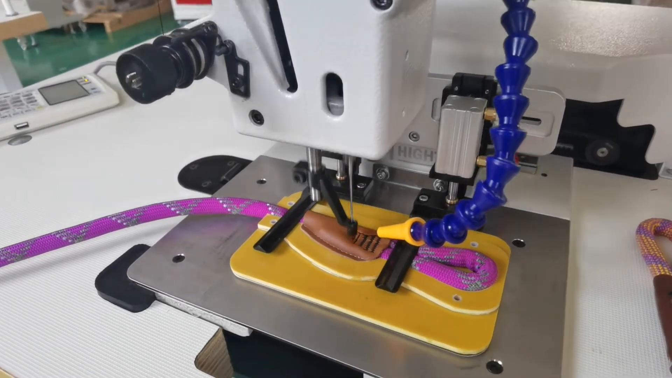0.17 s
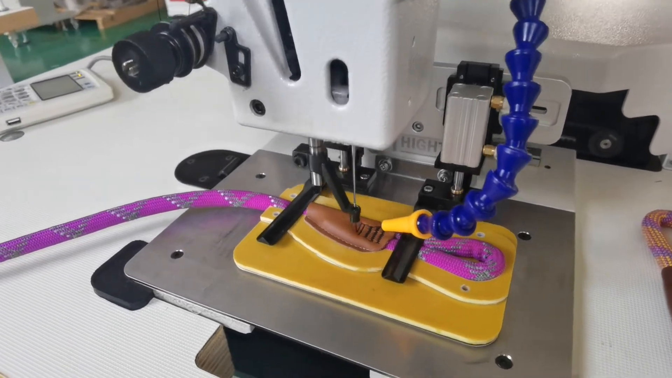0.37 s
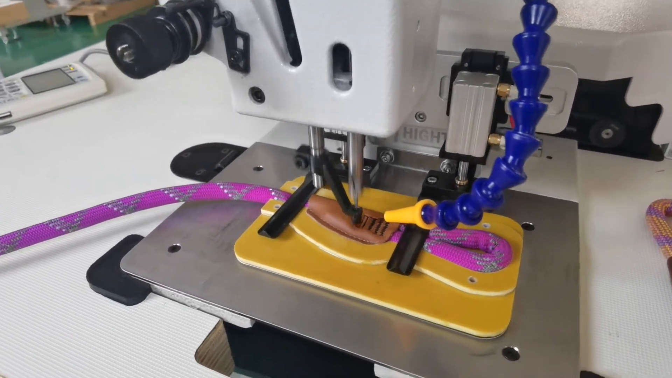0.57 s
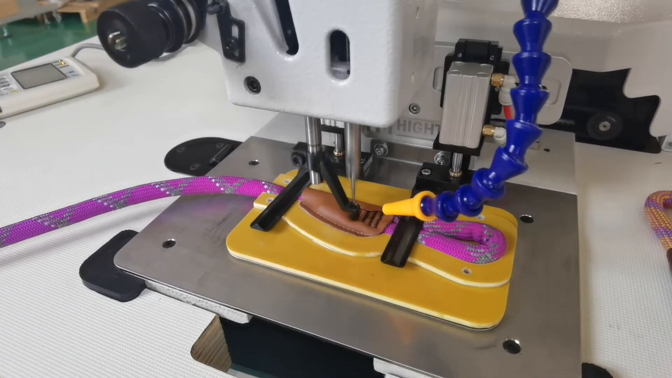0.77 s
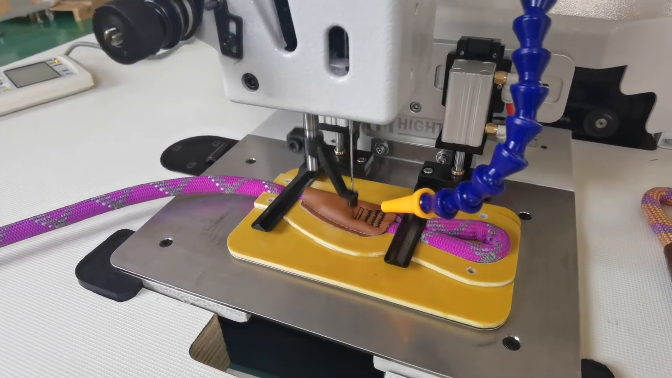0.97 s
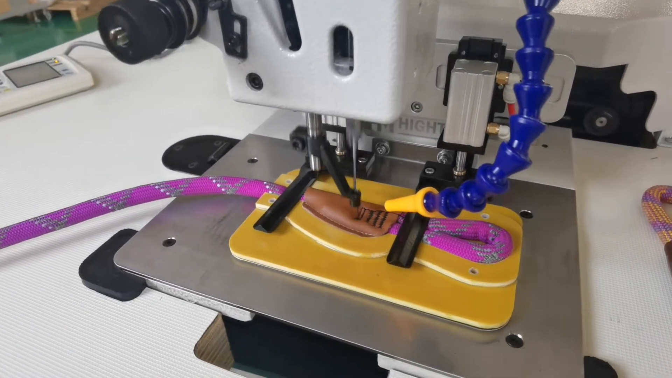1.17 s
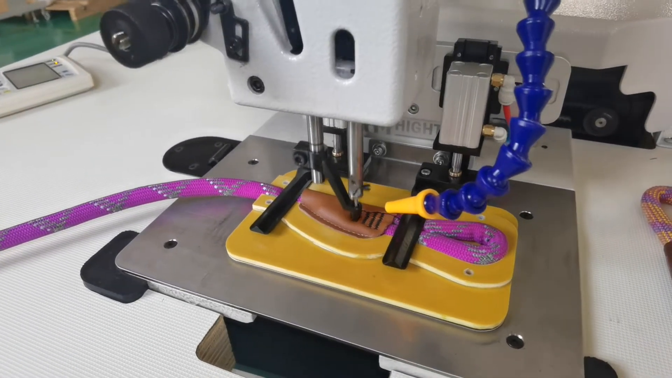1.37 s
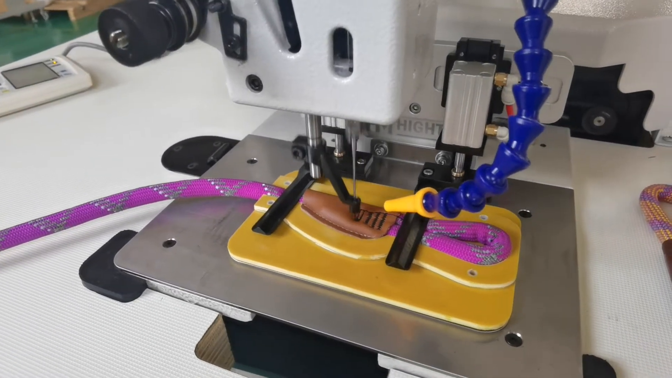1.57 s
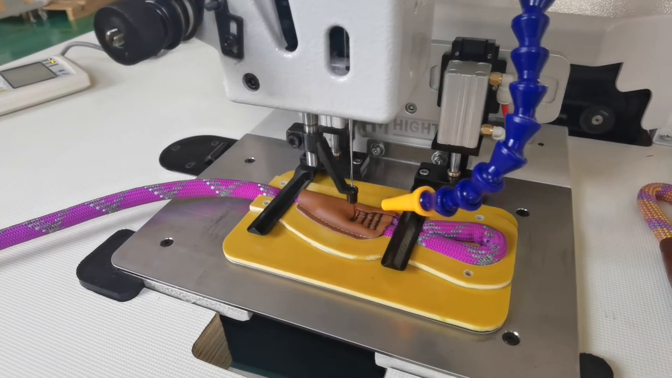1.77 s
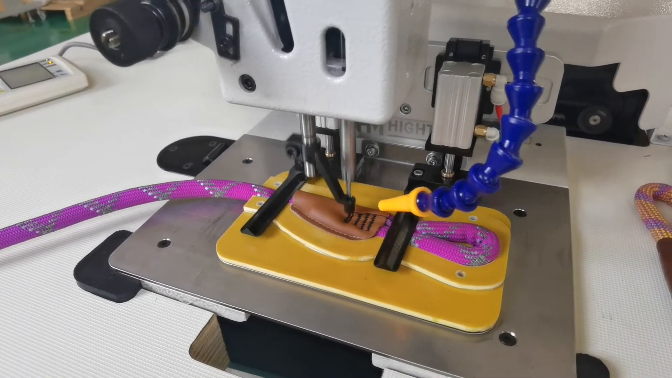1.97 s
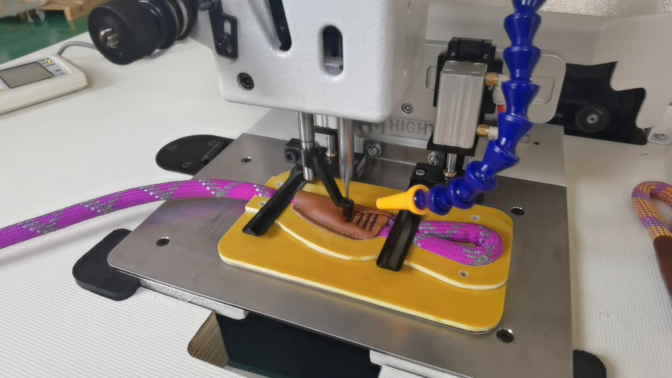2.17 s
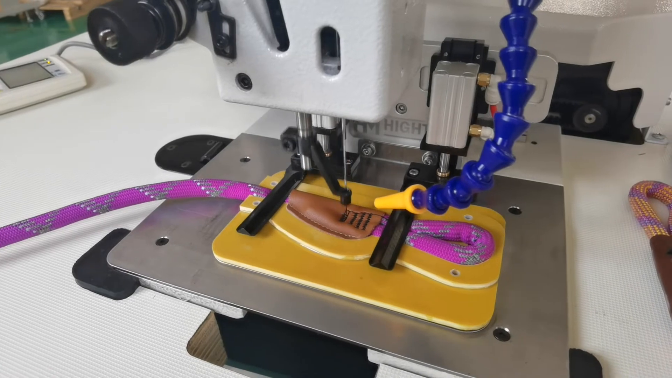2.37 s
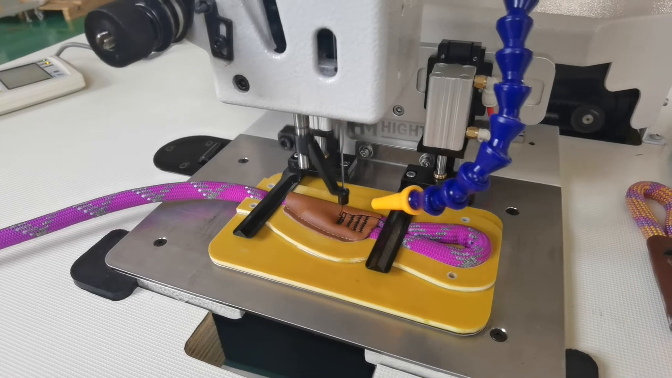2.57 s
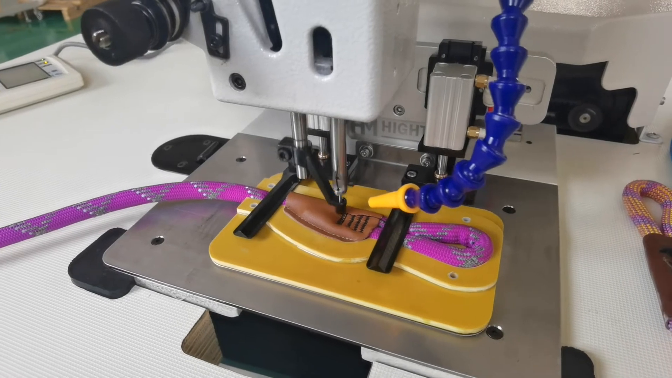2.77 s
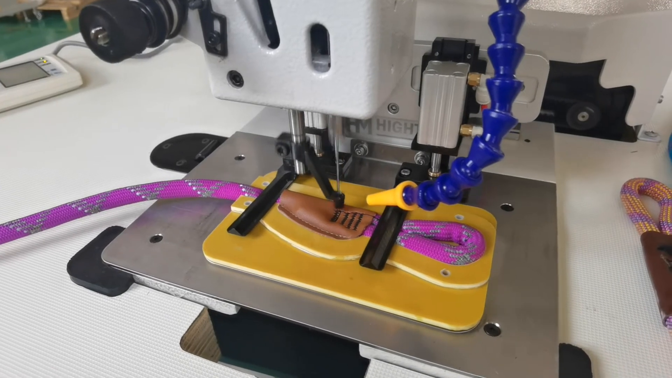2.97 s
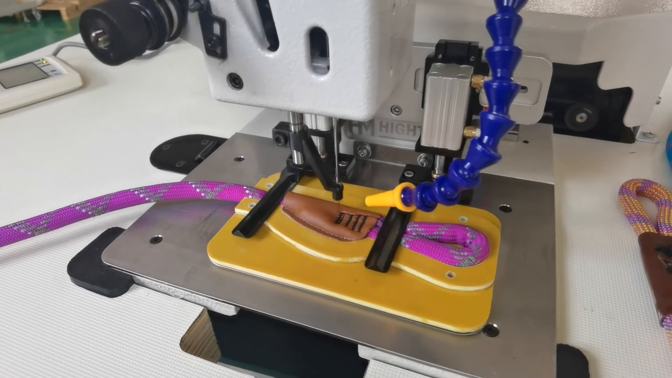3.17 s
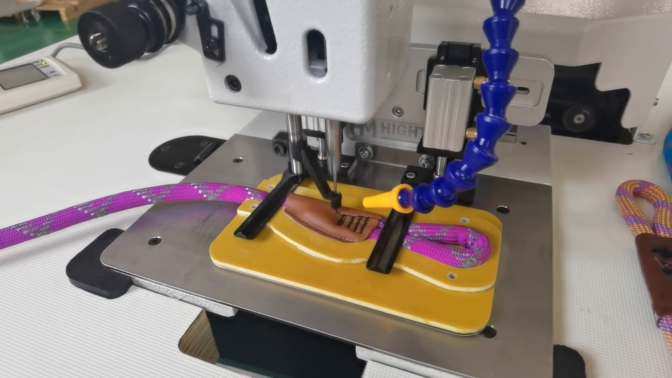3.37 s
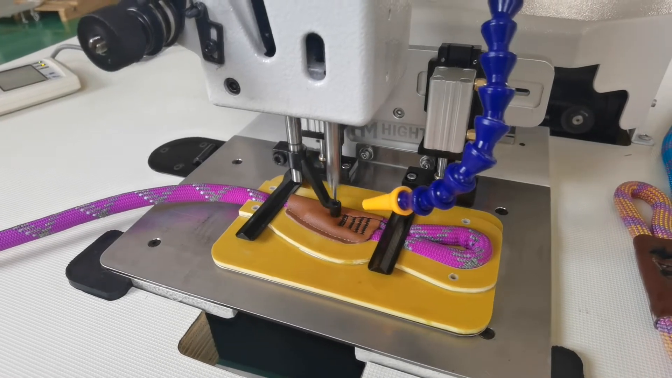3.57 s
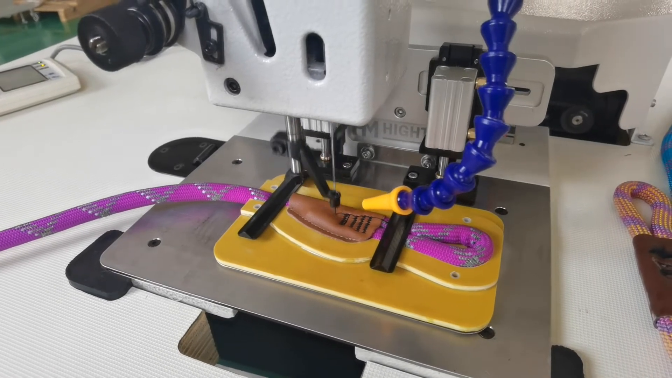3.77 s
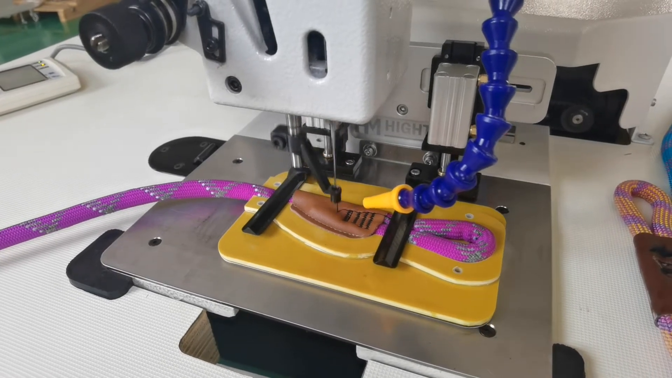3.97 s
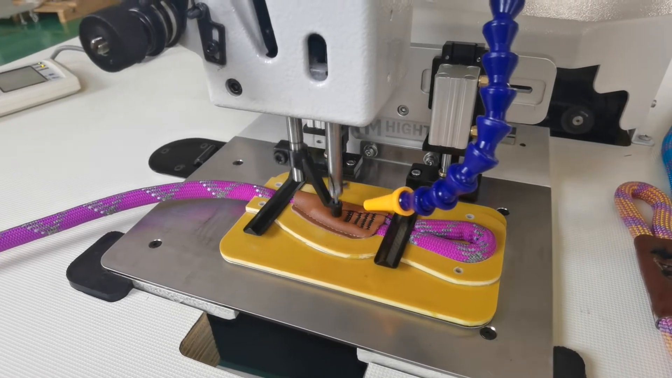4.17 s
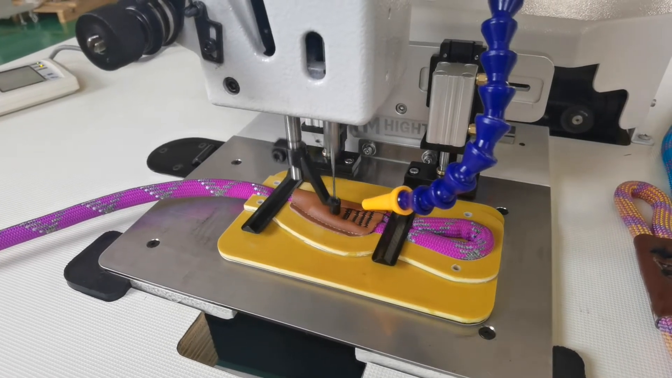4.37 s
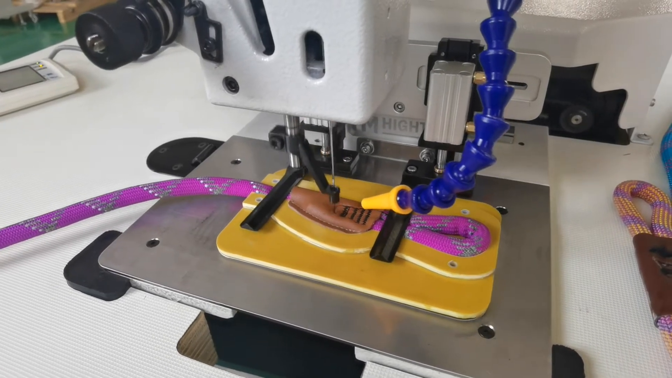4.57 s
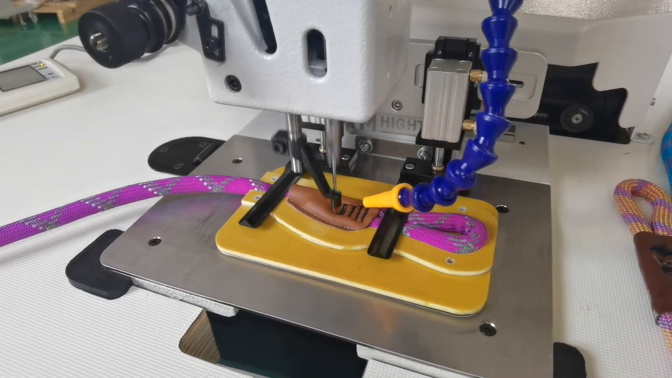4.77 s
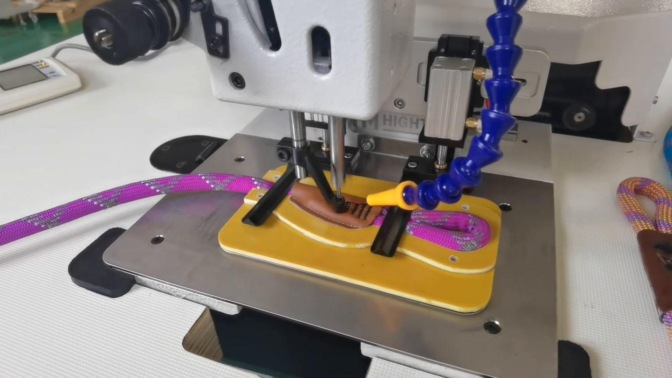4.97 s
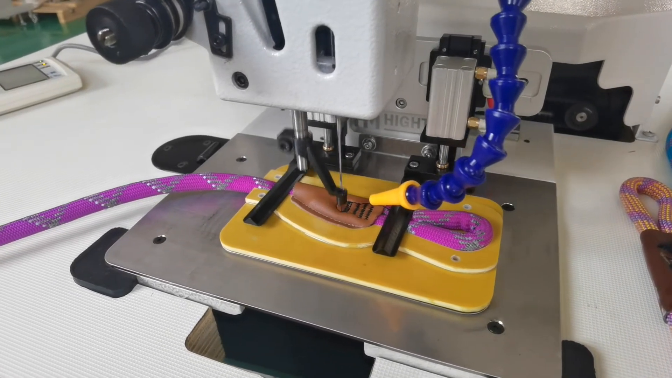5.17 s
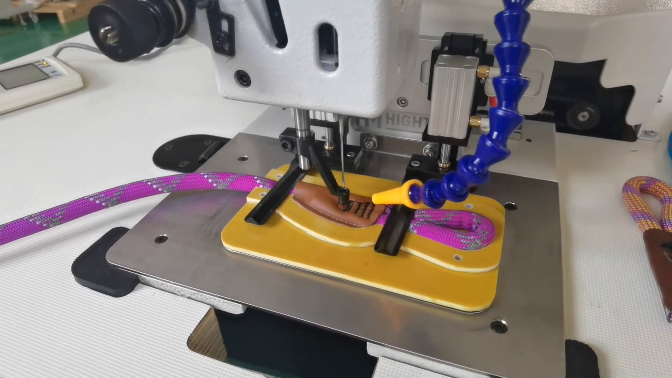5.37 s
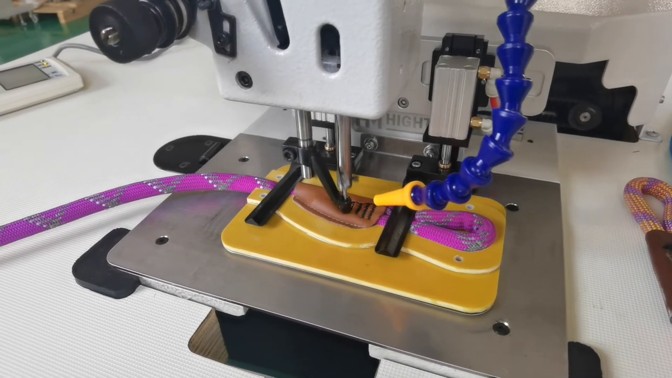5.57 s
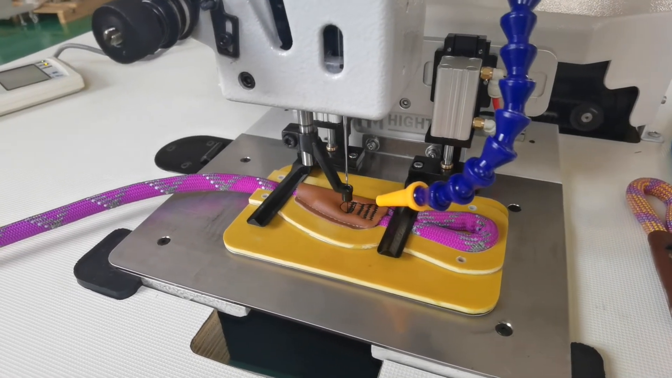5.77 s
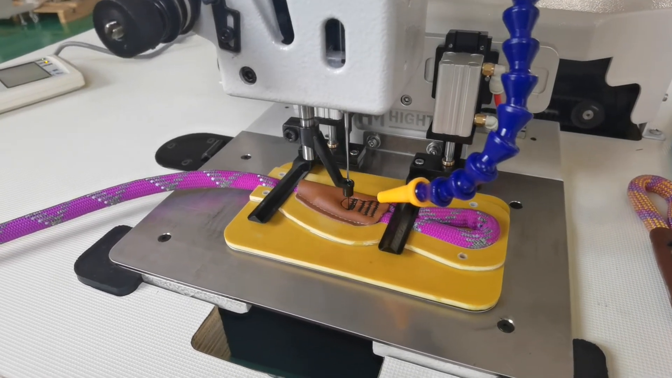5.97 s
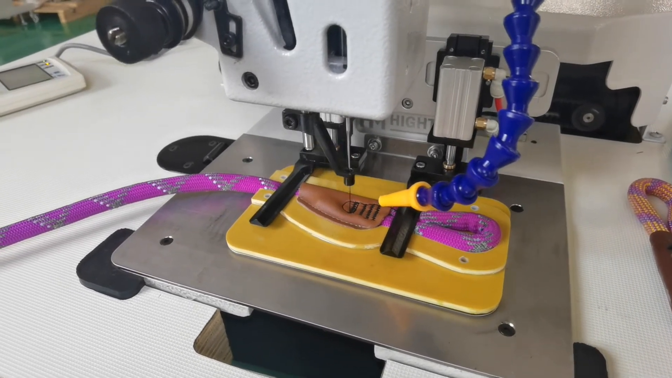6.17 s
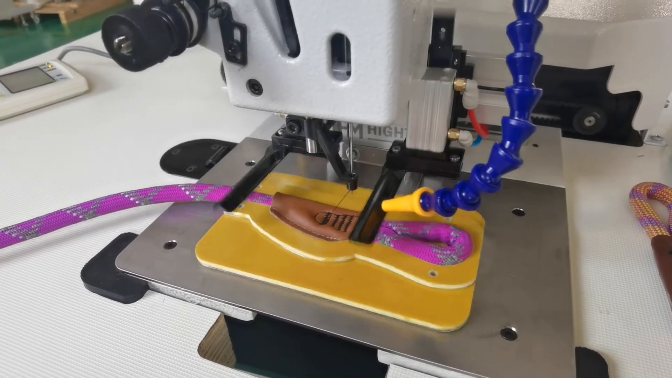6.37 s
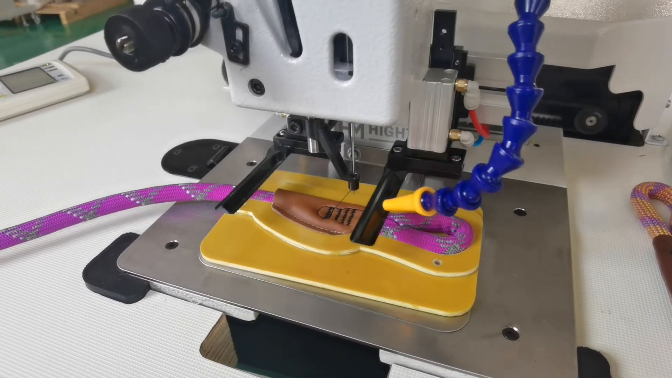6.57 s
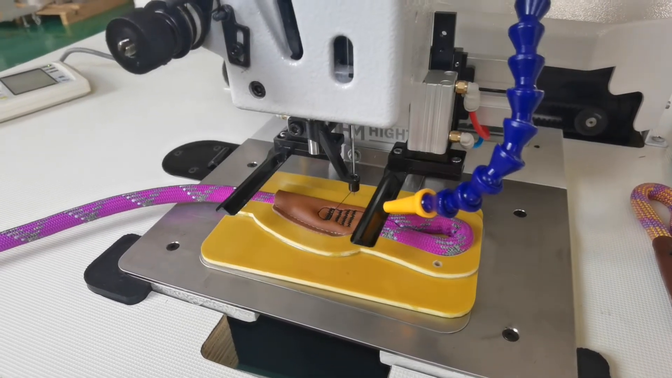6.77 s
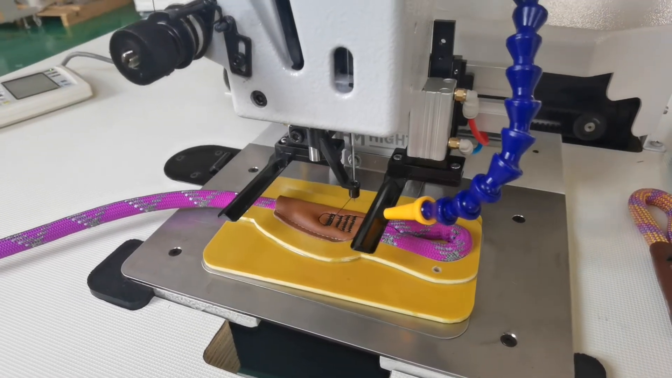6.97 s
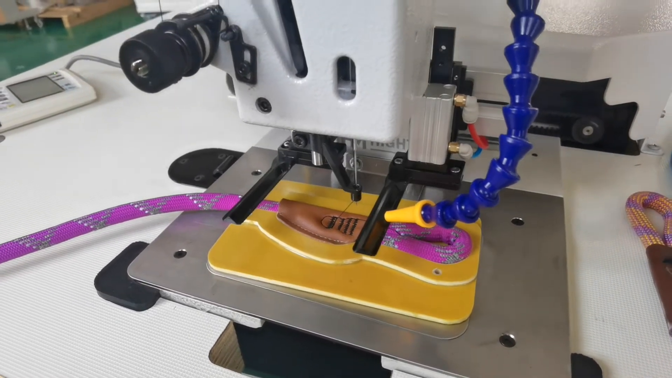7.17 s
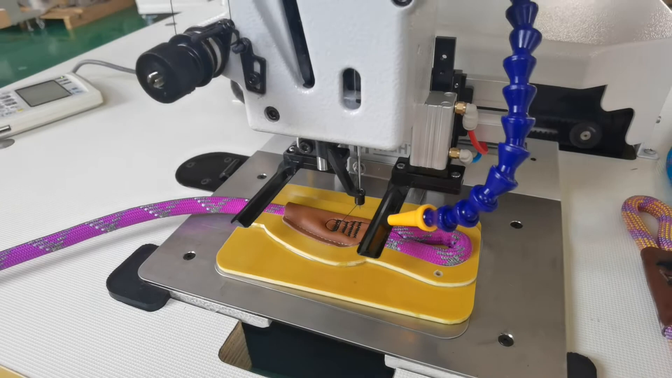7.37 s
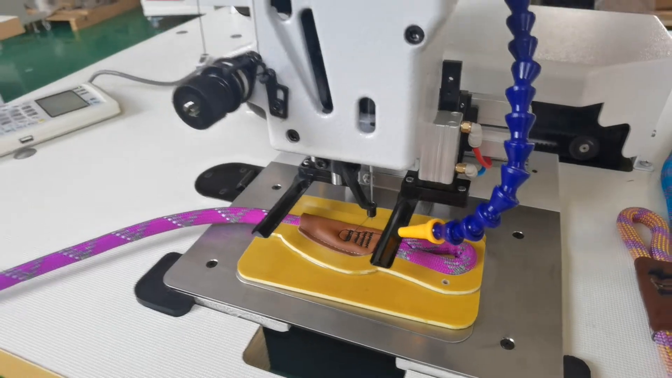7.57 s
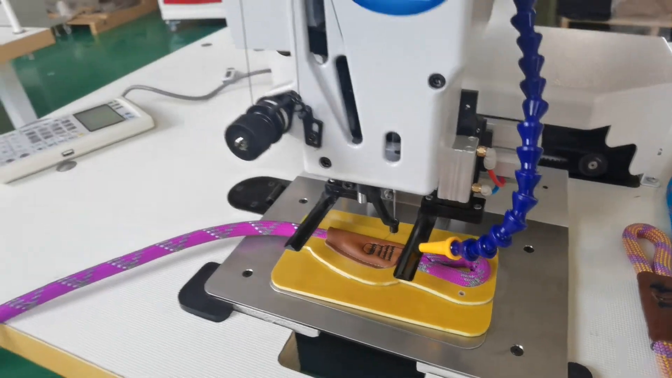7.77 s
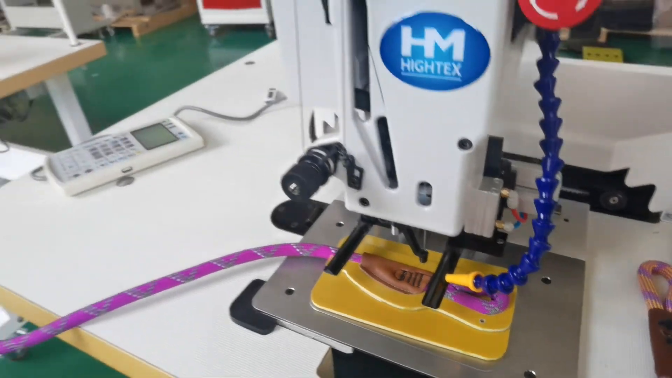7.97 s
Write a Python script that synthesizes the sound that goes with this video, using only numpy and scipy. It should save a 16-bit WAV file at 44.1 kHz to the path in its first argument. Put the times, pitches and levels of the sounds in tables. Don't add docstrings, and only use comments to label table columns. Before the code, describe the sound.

A sewing machine rattles at a fast steady metallic pace, slows through two last strokes, then air puffs and sharp trimmer and clamp clicks end it.

```python
import sys
import numpy as np
from scipy import signal
from scipy.fft import rfft, irfft
from scipy.io import wavfile
from scipy.ndimage import uniform_filter1d

SR = 44100
rng = np.random.default_rng(int(sys.argv[2]) if len(sys.argv) > 2 else 0)


def boost_factor(decibels):
    exponent = np.asarray(decibels, float) / 20
    return 10 ** exponent


def log_audio(samples):
    frames = np.atleast_2d(samples).T
    limited = np.clip(frames, -1, 1)
    pcm = np.round(limited * 32767).astype(np.int16)
    wavfile.write(sys.argv[1], SR, pcm)


N = 353662
T = np.arange(N) / SR
HZ = np.fft.rfftfreq(4096, 1 / SR)
TURN_S, TURNS, STOP_S = .15524, 34, 5.2
TOPS = np.arange(TURNS) * TURN_S
RELEASE_S = 6.25


# (time [s], peak level [dB], ring frequency [Hz], hush before it [dB])
RESTARTS = [(.0174, -11, 6410, -2.5), (0.1765, -5.5, 6400, -2), (0.3504, -6, 6400, -6),
            (.4823, -4, 5720, -6), (0.642, -2.5, 6420, -10), (.7941, -5, 6400, -5),
            (0.9505, -12, 6070, -9.5), (1.103, -5, 5750, -2.5), (1.269, -11, 5940, -8.5),
            (1.4177, -7, 6540, -11.5), (1.5703, -7, 6390, -2), (1.727, -1.5, 6300, -6),
            (1.88, -4.5, 6500, -4.5), (2.036, -6, 6400, -5), (2.1926, -2, 6420, -1),
            (2.348, -5, 6100, -5.5), (2.659, -6, 6340, -9.5), (2.8135, -7, 6400, -9),
            (3.297, -8, 6330, -3.5), (3.4583, -4.5, 6000, -9), (3.587, 2, 6300, -5),
            (3.739, -2, 8000, -12.5), (3.897, -2, 5750, -5.5), (4.053, -3, 6400, -6.5),
            (4.3637, -21, 5940, -4), (4.5132, -1.5, 6400, -8), (4.69, -24, 6400, -6.5),
            (4.99, -16, 6400, -7), (5.1459, -4, 8200, -1.5)]


def drive_train():
    lull_db = np.full(TURNS, -5.5)
    restart = np.full(TURNS, .018)
    s, hush_db = np.transpose(RESTARTS)[[0, 3]]
    stroke = (s // TURN_S).astype(int)
    lull_db[stroke] = hush_db
    restart[stroke] = np.clip(s % TURN_S, .012, .021)

    which = np.minimum(T // TURN_S, TURNS - 1).astype(int)
    angle, near_db, slow_db = T % TURN_S, nearness(), slowing()
    turning = T < STOP_S
    fall = np.interp(angle, [.002, .007], [0, 1])
    jump_back = np.clip((restart[which] - angle) / 0.00075, 0, 1)
    lull = fall * jump_back * (lull_db[which] + 0.5)

    pace_db = np.where(turning, -26 + near_db + lull, slow_db)
    rattle_db = pace_db + turning * (2.64 + shaft_load(angle))
    steady_whirr_db = -36.5 + 1.32 * near_db + whirr_load() + 0.22 * lull
    slow_whirr_db = uniform_filter1d(slow_db, size=1500) - 14.5
    whirr_db = np.where(turning, steady_whirr_db, slow_whirr_db)

    rattle = steel_head(boost_factor(rattle_db) * patchy(grit(0.34, grain=60), patchy_db=4))
    whirr = gear_case(boost_factor(whirr_db) * patchy(grit(0.47, grain=150), patchy_db=4.5))
    return rattle + whirr + cooling_nozzle(boost_factor(pace_db - 14.0) * grit(.8, grain=40))


# (frequency [Hz], level [dB])
RATTLE = [(2060, -14.5), (3500, -16.5), (3920, -18), (5030, -7.5), (5430, -8), (6240, -0.5), (7370, -4),
          (8310, -0.5), (9140, -9.5), (9870, -9.5), (11700, -23.5), (15200, -36), (16000, -30.5)]
# (frequency [Hz], width [Hz], level [dB])
HEAD = [(3920, 250, -9), (4670, 17, 8), (5750, 470, 3), (6400, 42, 9), (7230, 210, 4.5), (7870, 100, 3),
        (8350, 420, 2), (9900, 400, 2)]


def steel_head(x):
    return colour(x, RATTLE, HEAD)


# (frequency [Hz], level [dB])
WHIRR = [(530, -26), (900, -8.5), (1050, -5.5), (1390, -5), (2010, 1), (2520, -4.5), (3440, 1.5), (3910, 5),
         (4500, -2.5), (5850, -55), (9900, -120)]
# (frequency [Hz], width [Hz], level [dB])
GEARS = [(2016, 220, 5), (2190, 180, 0), (2660, 460, 6.5), (3520, 190, 3), (3860, 320, -9)]


def gear_case(x):
    return colour(x, WHIRR, GEARS)


# (frequency [Hz], level [dB])
NOZZLE = [(7000, -35), (10500, 4.5), (13000, -2.5), (15800, -5.5)]


def cooling_nozzle(x):
    return colour(x, NOZZLE)


# (time after top [s], level [dB])
TURN = [(0, 4), (.005, -1), (.018, 3), (.045, 1.5), (.062, 0.5), (.082, -3.5), (.102, -1), (.114, 2),
        (.135, 0.5), (.15, 4), (.156, 3.5)]


def shaft_load(angle):
    return curve(TURN, 1, angle)


def whirr_load():
    angle = T % TURN_S
    pierce_s, pierce_width_s, pierce_db = 0.071, 0.02, 3.5
    return 0.18 * shaft_load(angle) + pierce_db * np.exp(-((angle - pierce_s) / pierce_width_s) ** 2)


# (start [s], length [s], level at start [dB], level at end [dB])
LAST_STROKES = [
    (5.203, 0.11, -24.5, -21),
    (5.359, 0.241, -21, -24.5),
]


def slowing():
    coast_db, sag_db, stop_db_s = -34.5, -3, 1191
    parts = [held(STOP_S, LAST_STROKES[-1][0] - STOP_S, coast_db, stop_db_s, stop_db_s)]
    for s, length, first_db, last_db in LAST_STROKES:
        u = np.clip((T - s) / length, 0, 1)
        shape_db = first_db + (last_db - first_db) * u + sag_db * np.sin(np.pi * u)
        parts.append(held(s, length, shape_db, stop_db_s, stop_db_s))
    return blend(parts)


# (time [s], nearness level [dB])
NEARNESS = [
    (0, 2),
    (.25, 4),
    (1, 3),
    (2.5, 0),
    (3.4, 0),
    (4.2, 0.35),
    (5.21, 0.65),
]


def nearness(t=T):
    return curve(NEARNESS, 1, t)


# (time [s], peak level [dB], ring frequency [Hz])
HOOK = [(0.1378, -10, 6300), (0.2929, -13, 6360), (0.4485, -12, 6280), (0.6015, -11, 6370),
        (0.7587, -9, 6530), (0.9141, -14.5, 6440), (1.0695, -14, 6900), (1.2227, -13, 5790),
        (1.3788, -10, 6400), (1.5368, -17, 7760), (1.6886, -21, 5670), (1.8446, -13, 6430),
        (1.9987, -16, 6440), (2.1551, -17, 7700), (2.3105, -12.5, 7860), (2.4652, -10, 6300),
        (2.6219, -13.5, 8040), (2.7764, -16.0, 6540), (2.9298, -18.5, 6380), (3.0859, -13, 6450),
        (3.2382, -16, 8040), (3.396, -10.5, 6500), (3.5518, -16, 6410), (3.7077, -17, 6420),
        (3.8611, -16, 8270), (4.0165, -12, 6500), (4.1725, -19, 6420), (4.3272, -12.5, 6430),
        (4.4822, -13, 6400), (4.6373, -16, 6380), (4.7926, -17.5, 6410), (4.9489, -13, 6430),
        (5.1076, -11, 8450)]
# (time [s], peak level [dB], ring frequency [Hz])
TAKE_UP = [(0.1487, -11, 7400), (0.3009, -17, 6380), (0.4577, -14.5, 6410), (0.615, -8, 6270),
           (0.7614, -14, 6420), (0.9256, -15.0, 6070), (1.0769, -14, 6430), (1.2358, -14.0, 5750),
           (1.3877, -13, 6450), (1.5439, -10, 6460), (1.6988, -11, 6460), (1.8552, -12.5, 6470),
           (2.0081, -15, 6530), (2.1659, -15, 8320), (2.3208, -16, 8340), (2.476, -22, 6170),
           (2.6327, -15, 6540), (2.7858, -14, 6450), (2.9421, -22, 7420), (3.0958, -18.0, 6450),
           (3.2536, -14.5, 6400), (3.4057, -15, 6410), (3.5622, -22, 6490), (3.7132, -22, 8360),
           (3.8728, -21, 8350), (4.0258, -14, 7790), (4.1837, -18, 8260), (4.3362, -20, 7720),
           (4.4909, -21, 7910), (4.648, -13, 6400), (4.8027, -15, 7730), (4.9625, -12, 6440),
           (5.1173, -16.5, 7350)]
# (time [s], peak level [dB], ring frequency [Hz])
STRAYS = [(0.5703, -15, 6400), (1.039, -11.5, 7800), (1.2595, -10, 6010), (1.8198, -9, 8400),
          (3.25, -4, 6500), (4.61, -13, 8600), (1.356, -12, 6300), (1.666, -13, 8700), (2.053, -8, 8200),
          (2.187, -7, 8350), (2.3667, -7, 6160), (2.5563, -10, 6160), (2.806, -3.5, 8300),
          (3.487, -11, 6240), (3.796, -8.5, 6310), (3.9197, -9, 6120), (3.952, -7.5, 6420),
          (4.1434, -12, 8400), (4.2312, -15, 8570), (4.451, -10.5, 8300), (4.963, -8, 6500),
          (5.0176, -9.5, 8350), (5.297, -12, 7000), (5.363, -9, 6540), (5.5853, -8, 8360)]
# (time [s], peak level [dB], ring frequency [Hz])
CASE_RINGS = [(0.3641, -25, 3470), (0.6809, -34, 3140), (1.3034, -27, 3490), (1.6876, -27.5, 2720),
              (2.2338, -37, 3460), (2.4643, -31, 2960), (2.8604, -28, 2930), (3.7933, -27, 2700),
              (4.4114, -22.5, 3480), (4.568, -24, 3490), (4.8379, -28, 3390), (4.8663, -27.5, 3340),
              (4.9482, -28, 3000), (5.0275, -26.5, 3520),
              (0.0697, -26, 2020), (0.2089, -26, 1920), (0.2678, -24, 1960), (0.3072, -18.5, 2090),
          (0.3356, -22, 2370), (0.4569, -25, 2200), (0.6898, -21, 1940), (0.9562, -23, 2000),
          (1.7614, -33, 2040), (2.2443, -24, 2100), (4.0567, -28, 2450), (4.3994, -32, 1970),
          (4.7267, -30, 2010), (5.1462, -27, 1960)]


def clanks():
    hook = np.array(HOOK) + [0, 8.5, 0]
    take_up = np.array(TAKE_UP) + [0, 6, 0]
    sharp = scrape(np.c_[hook.T, np.transpose(STRAYS)], 0.00047, 0.017, 0.037, -9.0, -6.5)
    foot = scrape(np.transpose(RESTARTS)[:3], 0.001, 0.034, 0.018, -10.5, -7.5)
    case = scrape(np.transpose(CASE_RINGS), 0.0025, .03, 0.068, -13.5, 3.3)
    lever = scrape(take_up.T, 0.0023, 0.036, 0.052, -10.5, -7.0)
    return sharp + foot + lever + case


def scrape(rows, rise, t60, ring_t60, grit_db, ring_db):
    s, db, hz = rows
    out = boost_factor(grit_db) * steel_head(burst(strikes(s, db), rise, t60) * grit(0.48, grain=30))
    t = T[:2000]
    phases = rng.uniform(0, 2 * np.pi, (len(s), 2, 1))
    for at, level_db, f, phase in zip((s * SR).astype(int), db, hz, phases):
        envelope = boost_factor(level_db + ring_db - 60 * t / ring_t60) * (1 - np.exp(-t / rise))
        out[:, at:at + len(t)] += envelope * np.sin(2 * np.pi * f * t + phase)
    return out


# (time [s], low ring level [dB], high ring level [dB])
BLOWS = [(0.0662, -34, -38), (0.2214, -37, -39), (0.3767, -35, -33.5), (0.5319, -35, -37.5),
         (0.6872, -34, -37), (0.8424, -33, -35.5), (0.9976, -36, -35.5), (1.1529, -46, -36),
         (1.3081, -35, -36.5), (1.4634, -38.5, -44), (1.6186, -33, -38.5), (1.7738, -38, -40),
         (1.9291, -36, -38.5), (2.0843, -33, -37.5), (2.2396, -40, -35), (2.3948, -37, -40),
         (2.55, -37, -38), (2.7053, -40, -40), (2.8605, -37, -39), (3.0158, -38, -40), (3.171, -37, -45),
         (3.3262, -40, -41), (3.4815, -37, -40), (3.6367, -38, -43), (3.792, -45.5, -42),
         (3.9472, -38, -37), (4.1024, -38, -36.5), (4.2577, -35, -38), (4.4129, -32.5, -38),
         (4.5682, -39, -39.5), (4.7234, -36.5, -38), (4.8786, -51, -41), (5.0339, -43, -36.5),
         (5.1891, -49, -36)]
# (frequency [Hz], level [dB], time to fall 60 dB [s])
PLATE = [(346, -11, 0.076), (615, 0.5, 0.069), (795, -10.5, 0.17), (1073, 4.5, 0.037), (1246, -1.5, 0.096),
         (1580, 2, 0.043), (2034, 12, 0.018), (2800, -0.5, 0.032), (3460, -7, 0.12)]
# (time after top [s], level [dB])
KNOCKS = [
    (.0178, -34.5),
    (.0248, -35),
    (.053, -30),
    (.0598, -51.5),
    (.0695, -36),
    (.114, -44),
    (.1355, -35),
    (.147, -30),
]
# (time after top [s], level [dB])
TICKS = [
    (.0166, -37.5),
    (.026, -37),
    (.0337, -44.5),
    (.0385, -33),
    (.0715, -35),
    (.107, -42),
    (.1137, -34.5),
    (.1365, -34.5),
    (.1465, -40),
    (.1505, -49),
]


def needle():
    loose = rng.standard_normal((TURNS, 4))
    s, low_db, high_db = np.transpose(BLOWS)
    second_s = s + .0045 + .0004 * loose[:, 0]
    punch = 0
    for db, modes in ((low_db - 1, PLATE[:3]), (high_db - 1, PLATE[3:])):
        blows = strikes(s, db - 2.0) + strikes(second_s, db - 6.0)
        weak_db = -39.5 + nearness(s[:-1]) + 1.5 * loose[:-1, 1:3].T
        blows += strikes(s[:-1] + 0.066, weak_db[0] - 17)
        blows += strikes(s[:-1] + 0.076, weak_db[1] - 8.5)
        crunch = burst(blows, 0.00035, 0.011) * grit(.7, grain=20)
        punch = punch + boost_factor(7.5) * ring(blows[None], modes) + boost_factor(-20.5) * ring(crunch, modes)
    knocks = burst(each_turn(KNOCKS, 0.00057, 2.7), 0.00052, 0.032) * grit(0.79, grain=40)
    snaps = burst(each_turn(TICKS, .0003, 2.8), .0003, 0.017) * grit(.7, grain=20)
    return punch + gear_case(knocks) + boost_factor(3.5) * cooling_nozzle(snaps) + boost_factor(11.5) * steel_head(snaps)


def each_turn(rows, wander, spread_db):
    angle, db = np.transpose(rows)
    chance = rng.standard_normal((TURNS - 1, len(rows), 2))
    s = TOPS[:-1, None] + angle + wander * chance[..., 0]
    level_db = db + nearness(s) + spread_db * chance[..., 1]
    return strikes(s.ravel(), level_db.ravel())


# (time [s], peak level [dB], ring frequency [Hz], low knock level [dB])
CLICKS = [(6.0878, -23, 5600, -53), (6.1636, -26, 5700, -60), (6.178, -34, 6430, -60),
          (6.194, -21, 5380, -60), (6.2723, -29, 8800, -54), (6.0327, -16, 6200, -48),
          (6.0413, -16, 6200, -26), (6.054, -30, 2400, -38), (6.061, -32, 2500, -39),
          (6.0398, -18, 3900, -36), (6.043, -9.5, 2890, -36.5), (6.0455, -15.5, 2490, -43),
          (6.2873, -26, 4700, -48), (6.307, -14, 8300, -40), (6.31, -11, 8200, -51),
          (6.3272, -2, 8480, -58), (6.334, -9, 6300, -22.5), (6.3378, -6.5, 4100, -52),
          (6.341, -11, 5840, -51), (6.3529, -0.5, 7200, -40), (6.372, -22, 5500, -42)]
# (frequency [Hz], level [dB], time to fall 60 dB [s])
CUTTER = [(2330, -1, .07), (2600, -3, .05), (2950, -6, .04), (4060, -11, .025)]
# (frequency [Hz], level [dB], time to fall 60 dB [s])
CLAMP = [(770, -25, .06), (1280, -6, 0.065), (2140, -9, 0.048), (2260, -15, 0.18), (3260, -27, 0.035),
         (4100, 1, 0.039)]
# (frequency [Hz], level [dB], time to fall 60 dB [s])
CLAMP_BAR = [(4090, -27, 1.2), (2090, -24, .5)]


def trimmer():
    s, db, hz, knock_db = np.transpose(CLICKS)
    snap = burst(strikes(s, db), .0001, .012) * grit(.9, grain=15)
    crack = colour(snap, [(1500, -29), (3500, -3), (7000, 9.0), (11000, -9.5), (16000, -28)])
    knocks = strikes(s, knock_db)
    thud = colour(burst(knocks, 0.0011, 0.061) * grit(0.61, grain=30),
                  [(500, -22), (1200, -17), (2400, -11.0), (3500, -10), (5000, -16)])
    out = boost_factor(-9.0) * crack + boost_factor(-2) * thud
    out += boost_factor(4.0) * ring(knocks[None] * (T > 6.2), CLAMP + CLAMP_BAR)
    out += boost_factor(4.0) * ring(knocks[None] * (T < 6.2), CUTTER)
    t = T[:1500]
    for at, level_db, f in zip((s * SR).astype(int), db, hz):
        envelope = boost_factor(level_db - 8.5 - 60 * t / 0.036)
        out[:, at:at + len(t)] += envelope * np.sin(2 * np.pi * f * t + np.array([[0], [1.5]]))
    return out


# (start [s], hold [s], jet level [dB], body level [dB], release speed [dB/s])
PUFFS = [
    (5.611, 0.4, -36, -46.5, 74),
    (5.821, 0.11, -21.5, -34, 294),
    (6.06, 0.027, -44.5, -40, 214.5),
    (6.168, 0.035, -40.5, -49, 250),
    (6.299, .01, -38, -41, 300),
    (6.332, 0.0042, -15.5, -32, 520),
    (6.368, 0.045, -33, -31.5, 143),
]
# (frequency [Hz], level [dB])
JET = [(2350, -27), (4000, -9.5), (4900, -4.5), (5630, -2.5), (7660, -1), (8260, -0.5), (10400, -9.5),
       (10800, -23), (12900, -27), (16000, -20)]
# (frequency [Hz], width [Hz], level [dB])
VALVE = [(3900, 300, -11), (4600, 600, -1.5), (5690, 150, 11.5), (6200, 80, 7), (7100, 200, 6),
         (8250, 300, 5), (9600, 150, 2)]
# (frequency [Hz], level [dB])
HISS = [(1200, -28), (1900, -15), (2600, -3.5), (3200, 0), (3650, -2), (3950, -14), (4300, -6), (5200, -30)]
# (frequency [Hz], level [dB])
CASING = [(450, -1), (800, -3), (1500, 2.5), (2100, -0.5), (3000, -3.5), (4100, 4.5), (5200, 6)]


def air_cylinder():
    attack_db_s = 1400
    jet_db = blend([held(s, hold, db, attack_db_s, fall) for s, hold, db, _, fall in PUFFS])
    body_db = blend([held(s, hold, db, attack_db_s, fall) for s, hold, _, db, fall in PUFFS])
    low = boost_factor(body_db) * grit(0.96, grain=80)
    body = colour(low * (T < RELEASE_S), HISS)
    body += colour(low * (T >= RELEASE_S), CASING, [(780, 210, 9.0), (2100, 110, 11.0), (3970, 90, 7.8)])
    jet = colour(boost_factor(jet_db) * grit(0.54, grain=80), JET, VALVE)
    return jet + body + cooling_nozzle(boost_factor(jet_db - 15) * grit(0.7, grain=40))


# (middle [s], half length [s], boom level [dB], wash level [dB])
SHAKES = [(0.207, 0.73, -41.5, -41), (0.804, 0.095, -38.5, -42), (2.32, 0.66, -48.5, -47),
          (2.872, 0.073, -38.5, -61), (3.424, 0.19, -42.5, -56), (4.093, 0.51, -44.5, -44),
          (4.742, 0.24, -38.5, -46), (5.31, 0.16, -40.5, -47.5), (5.766, 0.055, -40, -52),
          (5.895, 0.037, -40, -48), (5.988, 0.027, -36, -50), (6.083, 0.062, -32.5, -39.5),
          (6.233, 0.086, -35, -50), (6.4, 0.042, -57, -42.5), (6.492, 0.062, -40, -68),
          (6.89, 0.069, -40.5, -68), (7.142, 0.036, -36, -68), (7.267, 0.11, -41, -73),
          (7.5, 0.11, -37, -54.5), (7.66, 0.16, -37.5, -55), (7.96, 0.18, -38, -40)]
# (frequency [Hz], level [dB])
BOOM = [(40, -28), (70, -16.5), (100, -4.5), (123, 0), (150, -14), (200, -14), (290, -22), (400, -77)]
# (frequency [Hz], level [dB])
WASH = [(100, -6), (170, -0.5), (257, -2.5), (343, 1.5), (383, -3.5), (617, -5), (683, -7.5), (792, -4.5),
        (905, -10.5), (1100, -10), (1430, -17), (2420, -120)]
# (start [s], hold [s], level [dB])
SHOVES = [
    (4.394, 0.042, -47),
    (5.4, 0.024, -52),
    (5.87, 0.022, -40),
    (5.987, 0.081, -42),
    (6.217, 0.084, -43.5),
    (6.745, .03, -54),
]
# (frequency [Hz], level [dB])
SHOVE = [(110, -41), (170, -13), (280, 0), (350, -5.5), (480, -24)]
# (frequency [Hz], level [dB])
SHOP = [(410, -47), (700, -24), (982, -17), (1070, -19), (1660, -15), (2250, -10.5), (2450, -17.5),
        (4000, -23.5), (4950, -20.5), (5140, -17), (7870, -25), (14000, -54.5)]
# (time [s], level [dB])
LIFT = [
    (0, -84),
    (7.6, -86),
    (7.85, -74),
    (8.1, -72),
]


def workshop():
    turning = T < STOP_S
    swells = [(-8.7 * ((T - s) / half) ** 2, boom_db, wash_db) for s, half, boom_db, wash_db in SHAKES]
    boom_db = blend([np.where(turning, -46.5, -47.5)] + [swell + db for swell, db, _ in swells])
    gears_db = np.where(turning, -43.5 + 0.64 * nearness() + 1.58 * whirr_load(), -52.5)
    wash_db = blend([gears_db] + [swell + db for swell, _, db in swells])
    boom = colour(boost_factor(boom_db) * grit(1.9, grain=900), BOOM)
    wash = colour(boost_factor(wash_db) * grit(1.4, grain=400), WASH)
    shove_db = blend([held(*row, 900, 350) for row in SHOVES])
    shove = colour(boost_factor(shove_db) * grit(2.5, grain=300), SHOVE)

    waver = evened(uniform_filter1d(rng.standard_normal(N), size=9000))
    whine_db = held(6.95, .5, -62.5, 7, 8) + 1.5 * waver
    whine = boost_factor(whine_db) * np.sin(2 * np.pi * np.cumsum(4800 + 2 * waver) / SR)

    hum = boost_factor(-50.5) * colour(grit(0.86, grain=600), SHOP)
    bright = boost_factor(curve(LIFT, 1)) * cooling_nozzle(grit(.5, grain=300))
    return boom + wash + shove + whine, patchy(hum + bright, patchy_db=2.0)


def evened(x):
    return x / np.sqrt(np.mean(x ** 2) + 1e-20)


def curve(rows, column, t=T):
    rows = np.array(rows)
    return np.interp(t, rows[:, 0], rows[:, column], left=-120, right=-120)


def held(start, hold, db, rise_db_s, fall_db_s):
    return db - rise_db_s * np.maximum(start - T, 0) - fall_db_s * np.maximum(T - start - hold, 0)


def blend(parts_db):
    return 10 * np.log10(np.sum(boost_factor(2 * np.array(parts_db)), axis=0) + 1e-12)


def colour(x, points, peaks=()):
    hz, db = np.transpose(points)
    db = np.interp(np.log(HZ + 1), np.log(hz + 1), db, left=-90, right=-90)
    db = db + sum(bump_db / (1 + (2 * (HZ - f) / width) ** 2) for f, width, bump_db in peaks)
    log_gain = np.log(boost_factor(np.maximum(np.r_[db, db[-2:0:-1]], -90)))
    taps = np.fft.ifft(np.exp(np.conj(signal.hilbert(log_gain)))).real[:2048]
    return signal.oaconvolve(x, taps[None] / np.linalg.norm(taps))[:, :N]


def grit(rough_db, grain):
    lumps = evened(uniform_filter1d(rng.standard_normal(N), size=grain))
    return evened(rng.standard_normal((2, N)) * boost_factor(rough_db * lumps))


def patchy(x, patchy_db):
    z = signal.stft(x, nperseg=512, noverlap=384)[2]
    field = uniform_filter1d(rng.standard_normal(z.shape[1:]), size=2, axis=0)
    field = uniform_filter1d(field, size=9, axis=1)
    gain = boost_factor(patchy_db * evened(field))
    return signal.istft(z * evened(gain), nperseg=512, noverlap=384)[1][:, :N]


def strikes(times, db):
    x, at = np.zeros(N), (np.asarray(times) * SR).astype(int)
    np.add.at(x, at[at < N], boost_factor(np.asarray(db))[at < N])
    return x


def burst(x, rise, t60):
    t = T[:6000]
    shape = (1 - np.exp(-t / rise)) * boost_factor(-60 * t / t60)
    return signal.oaconvolve(x, shape / shape.max())[:N]


def ring(x, modes):
    t = T[:20000]
    taps = 0
    for f, db, t60 in modes:
        phase = rng.uniform(0, 1.75, (2, 1))
        taps = taps + boost_factor(db - 60 * t / t60) * np.sin(2 * np.pi * f * t + phase)
    return signal.oaconvolve(x, taps, axes=1)[:, :N]


# (frequency [Hz], left-right likeness [0-1])
ALIKE = [(30, .5), (60, 0.87), (125, 0.94), (300, 0.93), (500, 0.84), (1000, 0.37), (2000, 0.079),
         (5000, 0.16), (8000, 0.29), (14000, 0.3)]
# (frequency [Hz], level [dB])
LOUDER_LEFT = [(60, 1), (130, -2), (290, 2), (640, 2), (1410, 3), (3100, 3.5), (6820, 3), (15000, 0.6)]


def ports(pair, lean, delay):
    hz = np.fft.rfftfreq(N, 1 / SR)
    a, b = rfft(pair)
    like_hz, likeness = np.transpose(ALIKE)
    alike = np.clip(np.interp(np.log(hz + 1), np.log(like_hz), likeness), 0, 1)
    tilt = boost_factor(lean / 2 * np.interp(hz, *np.transpose(LOUDER_LEFT)))
    right = (alike * a + np.sqrt(1 - alike ** 2) * b) * np.exp(-2j * np.pi * hz * delay)
    return irfft(np.array([a * tilt, right / tilt]), N)


def scene():
    low, shop = workshop()
    machine = ports(drive_train() + clanks() + needle(), 1.87, 0.0002174)
    air = ports(air_cylinder() + trimmer(), 0.84, .0001)
    return boost_factor(-1.5) * (machine + air + ports(shop, -0.21, -0.00014)) + ports(low, 0.41, .00005)


def low_pass(x):
    return signal.sosfilt(signal.butter(12, 16520, fs=SR, output="sos"), x)


def record(dry):
    cut = signal.sosfilt(signal.butter(2, 55, "high", fs=SR, output="sos"), dry)
    edge = signal.firwin(511, 15850, window=("kaiser", 9), fs=SR)
    finished = signal.oaconvolve(np.tanh(cut), edge[None], "same")
    return low_pass(finished)


dry = scene()
out = record(dry)
log_audio(out)
```